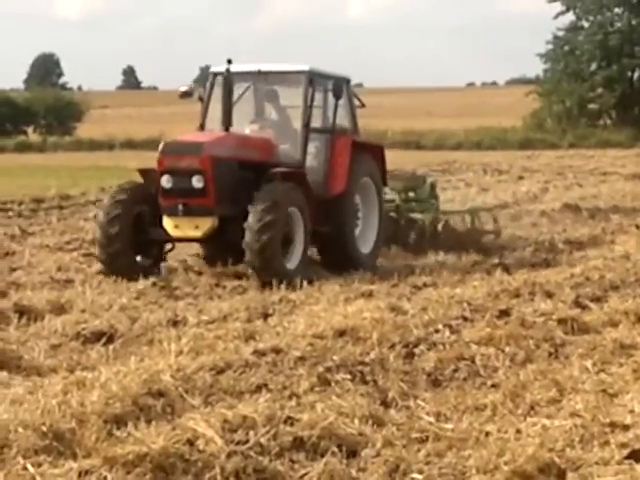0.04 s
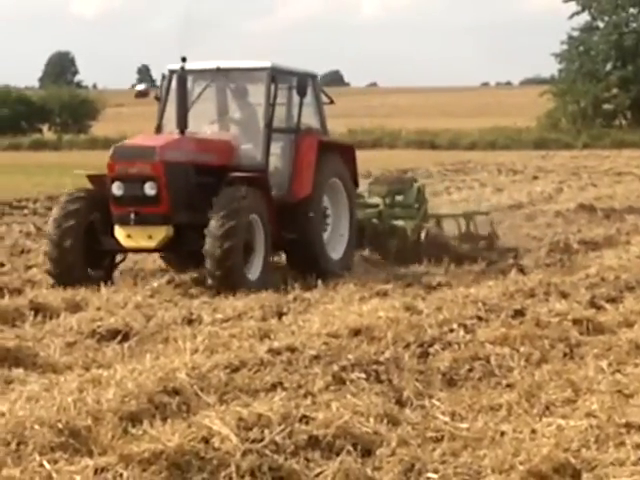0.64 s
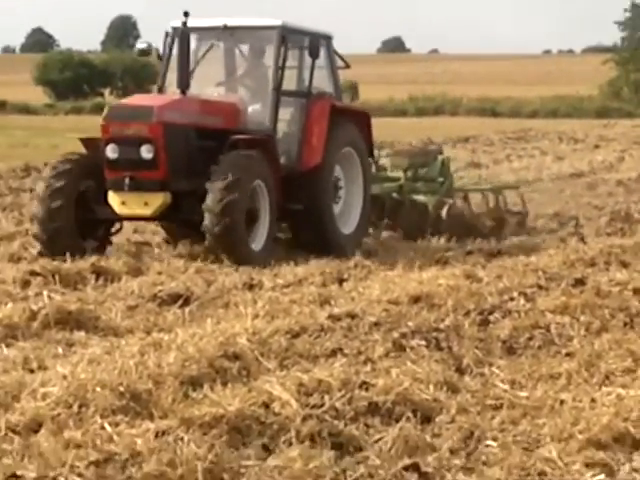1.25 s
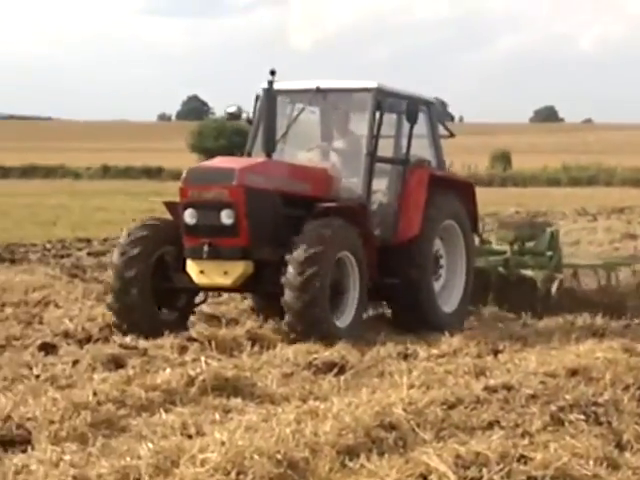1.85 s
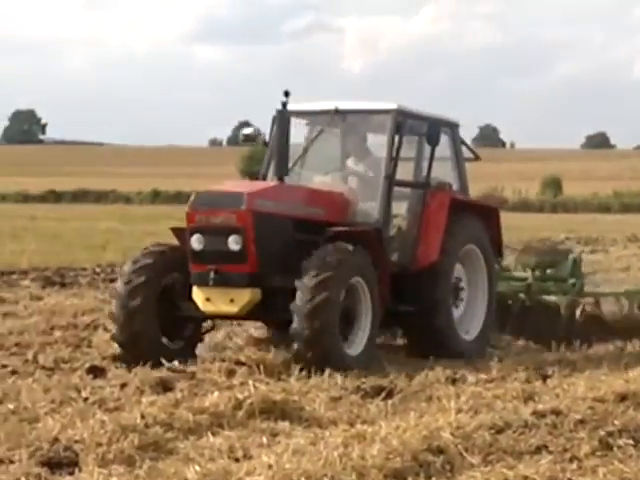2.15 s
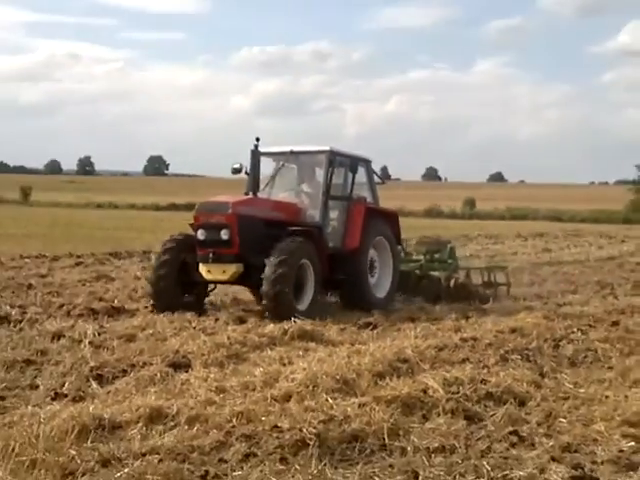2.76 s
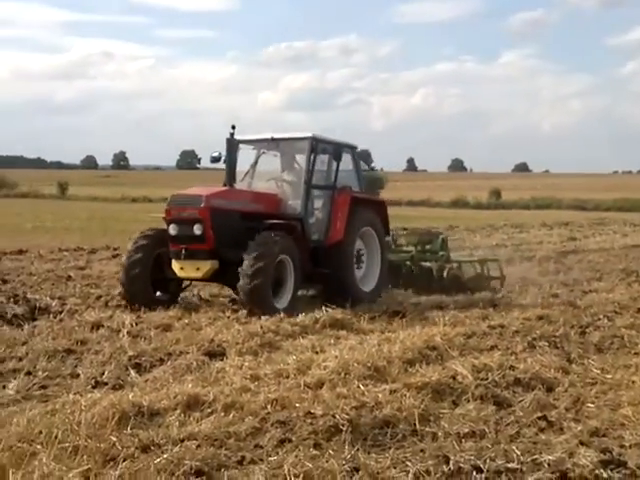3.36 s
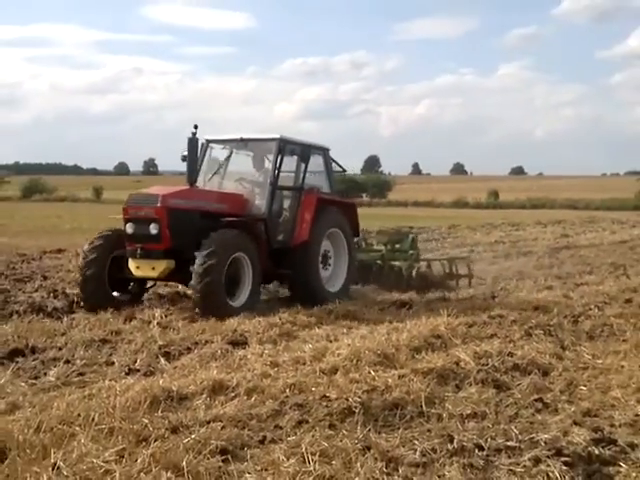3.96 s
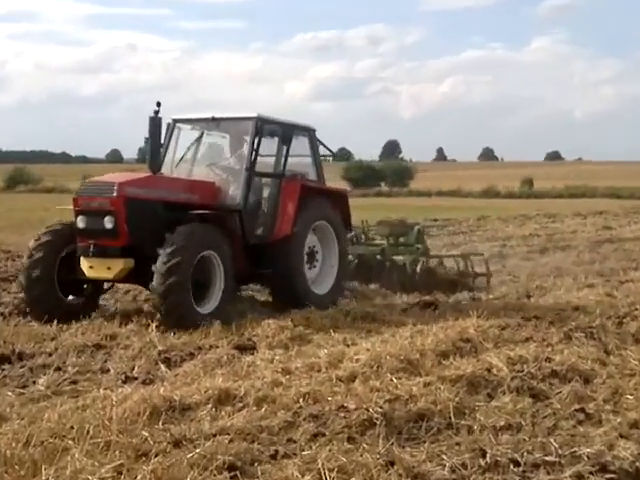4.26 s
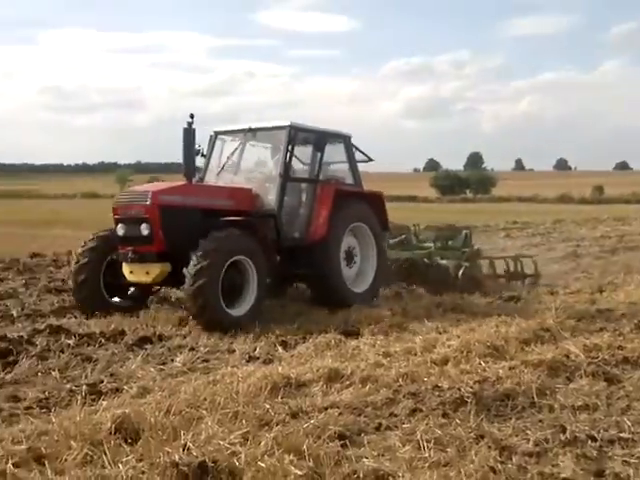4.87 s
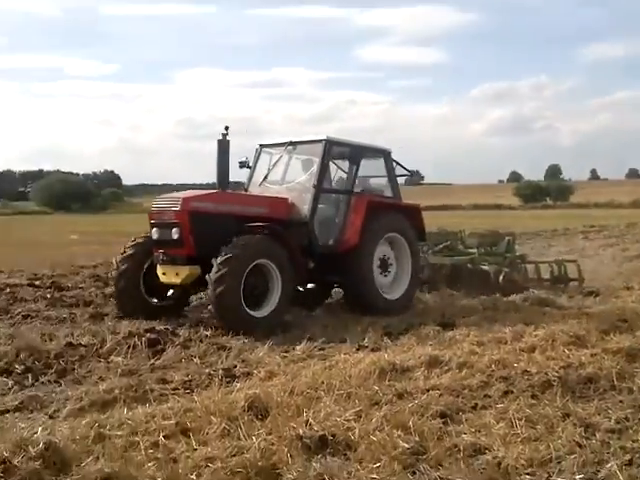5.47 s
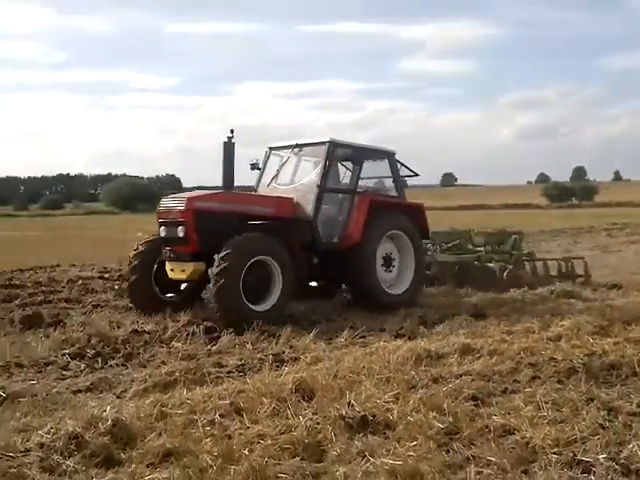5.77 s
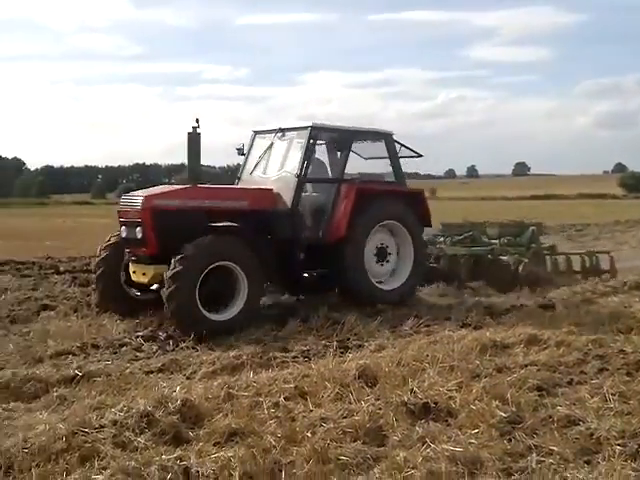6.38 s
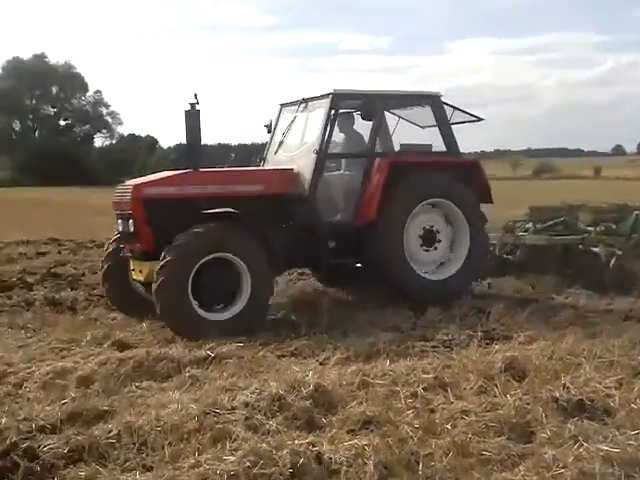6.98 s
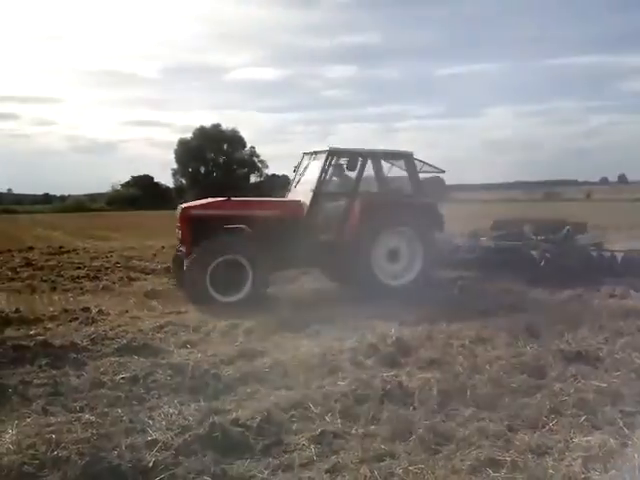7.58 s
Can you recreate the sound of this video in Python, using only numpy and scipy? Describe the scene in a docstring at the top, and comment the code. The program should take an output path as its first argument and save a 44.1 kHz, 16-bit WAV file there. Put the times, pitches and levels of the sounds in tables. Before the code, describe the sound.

A diesel tractor drones and clatters closer under load, with rising gear whine, clinking steel and wind rumbling on the microphone.

```python
"""A six-cylinder diesel tractor draws nearer, pulling a disc harrow over stubble; a breeze rumbles on
the microphone ports throughout. It starts head-on: the exhaust drones at the firing rate, the block
knocks, injectors snap, discs hiss through straw. Each bite of the discs slows the crank and the
governor adds fuel. Straw rustles at 1.2 s. From 3.5 s the gear whine grows; from 4 s loose steel
clinks and grit scrapes. The engine sags deepest near 6.2 s and ends close by, almost side-on."""
import sys
import numpy as np
from scipy import signal
from scipy.fft import rfft, irfft
from scipy.io import wavfile
from scipy.ndimage import uniform_filter1d, map_coordinates

SR = 44100
rng = np.random.default_rng(int(sys.argv[2]) if len(sys.argv) > 2 else 0)


def generate_wav(sig):
    """Save sig (samples, or channels by samples) to the path in sys.argv[1] as 16-bit PCM at SR."""
    pcm = np.round(np.clip(np.atleast_2d(sig).T, -1, 1) * 32767).astype(np.int16)
    wavfile.write(sys.argv[1], SR, pcm)


N = 336924
TIME = np.arange(N) / SR
HZ = np.maximum(np.arange(N // 2 + 1) * SR / N, 1)
CYLINDERS = 6  # firings per engine cycle (two crank turns)


def exhaust(cycle, turn, effort_hz, waver_db=2.05, load_db_per_hz=0.56):
    """Low lines locked to the crank, louder with more fuel; all but the firing line waver."""
    # Each row: cycle multiple, head-on dB, side-on dB. 6 is the firing rate, 3 one manifold.
    orders = [(3, -25, -18), (6, 1.5, 3.5), (9, -6.5, -14), (10, -32, -13), (11, -38, -21),
              (12, -12.5, -13), (13, -34, -18.5), (15, -25.5, -16.5), (16, -49, -26), (17, -36.5, -34),
              (20, -51, -35), (21, -30.5, -17), (23, -37, -25), (24, -22.5, -22.5), (27, -23.5, -25),
              (28, -55, -20), (30, -31.5, -42), (33, -37, -38)]
    # Stack resonances lift lines that slide into them. Each row: centre in Hz, width in Hz, gain in dB.
    stack = [(191.8, 11, 3), (238.9, 15.4, 6.5), (313.3, 12, 11.5)]
    # Drone in light soil. Each row: time in seconds, relative level in dB.
    drone = [(0, -21.5), (1.2, -20.5), (2.05, -21.5), (2.3, -20), (2.7, -20.5), (3.05, -18.5), (3.3, -18.5),
             (3.55, -20.5), (3.8, -20), (4.15, -20.5), (4.45, -19.5), (4.75, -20.5), (5.3, -21), (5.9, -20),
             (6.05, -22.5), (6.27, -19), (6.55, -21), (7.2, -20.5), (7.64, -18.5)]
    cycle_hz = np.gradient(cycle) * SR
    lines = 0
    for multiple, front_db, side_db in orders:
        phase = rng.random() * (multiple % (CYLINDERS // 2) > 0)  # manifold lines stay in step
        line = np.sin(2 * np.pi * (multiple * cycle + phase))
        stack_db = sum(db / (1 + (2 * (multiple * cycle_hz - hz) / width_hz) ** 2)
                       for hz, width_hz, db in stack)
        gain = from_db(stack_db + waver_db * drift(9.2) * (multiple != CYLINDERS))
        facing = (1 - turn) * from_db(front_db) + turn * from_db(side_db)
        lines = lines + line * gain * facing
    drone_db = in_time(drone)[0] + load_db_per_hz * effort_hz
    channel_db = [[-3.5], [-3.35]]
    return np.sqrt(2) * lines * from_db(drone_db) * from_db(channel_db)


def block(cycle, repeat_hz=2400, valve_hz=2600, valve_lead_cycles=0.019):
    """Spectra of the shaking block and its scattered clatter: combustion knocks low, valves tick high."""
    # Each entry: one cylinder's knock in dB, in firing order.
    knock_db = [-1, 2.2, -0.3, -1.2, -1.4, 1]
    # Each entry: one cylinder's valve and injector tick in dB.
    tick_db = [2.4, 0.77, 2.1, 2.1, 0.44, 0.44]
    # Direct sound of the block. Each row: frequency in Hz, density in dB.
    block_spectrum = [(270, -0.5), (430, -11.5), (500, -12.5), (630, -2), (790, -0.2), (1000, -6),
                      (1120, -13), (1800, -9), (3000, -21.5), (4300, -17), (6000, -27), (8000, -40.5),
                      (14500, -71)]
    # Clatter scattered by cab, wheels and ground. Each row: frequency in Hz, density in dB.
    scatter_spectrum = [(200, -50), (400, -14.5), (800, -19), (1400, -16), (2000, -25), (3000, -20),
                        (4200, -18.5), (5500, -30.5), (7500, -39), (14500, -70)]
    period = int(N / cycle[-1])
    one_cycle = unit(irfft(np.exp(2j * np.pi * rng.random(period // 2 + 1)), period))  # flat spectrum
    repeating = map_coordinates(one_cycle, [cycle % 1 * period], order=3, mode="grid-wrap")
    repeat_share = 0.62 * below(repeat_hz, order=2) * (1 - below(570, order=4))
    shake = filtered(repeating, np.sqrt(repeat_share))
    shake += filtered(rng.standard_normal(N), np.sqrt(1 - repeat_share))
    knocks = unit(firing_bursts(cycle, knock_db, decay=0.42, floor=2.4))
    ticks = unit(firing_bursts(cycle + valve_lead_cycles, tick_db, decay=1.0, floor=0.87))
    low = below(valve_hz, order=6)
    direct = (rfft(shake * knocks) * low + rfft(shake * ticks) * (1 - low)) * colour(block_spectrum)
    scattered = rfft(rng.standard_normal((2, N)) * ticks) * colour(scatter_spectrum)
    return direct, scattered


def firing_bursts(cycle, pattern_db, decay, floor, rise=0.082, uneven_db=0.5):
    """Envelope of unequal firings above a floor; rise and decay in firing periods."""
    firing = cycle * CYLINDERS
    number, age = firing.astype(int), firing % 1
    chance_db = uneven_db * rng.standard_normal(number[-1] + 1)
    strength_db = np.take(pattern_db, number, mode="wrap") + chance_db[number]
    burst = np.minimum(age / rise, np.exp((rise - age) / decay))
    return uniform_filter1d(from_db(strength_db), size=90) * (floor + burst)


def panels(spectrum, turn):
    """Different ringing sheets of metal face the listener as the tractor comes round."""
    # Bonnet, sump and covers. Each row: centre in Hz, width in Hz, head-on dB, side-on dB.
    modes = [(666.4, 28, -1, 3.5), (840, 240, 1, 1), (922, 160, 4, -3), (1183, 146, 4, -2),
             (1454, 52, 1.5, 10.5), (1610, 144, -6.5, -9), (1833, 90, 4, -3), (2350, 240, 4, -0.5),
             (2780, 220, -8.5, -4.5), (4280, 174, -0.5, -1), (3330, 520, 4, 5.5), (4600, 400, -15, -14),
             (5360, 1050, 2.5, 5.5), (5860, 250, -3.5, 0.5)]
    front = resonant([(hz, width_hz, db) for hz, width_hz, db, _ in modes])
    side = resonant([(hz, width_hz, db) for hz, width_hz, _, db in modes])
    return (1 - turn) * irfft(front * spectrum, N) + turn * irfft(side * spectrum, N)


def approach(sound, effort_hz):
    """Boom and knock outgrow the clatter as the engine's side comes into view; all rise with effort."""
    # Engine in light soil. Each row: time in seconds, then relative boom, knock and clatter in dB.
    radiated = [(0.0, -44, -31.5, -34.5), (1.4, -39, -30.5, -33), (2.6, -37, -28, -32),
                (4.3, -35.5, -25.5, -32.5), (5.7, -30.5, -24.5, -31.5), (6.4, -32, -24, -32.5),
                (7.64, -31.5, -23.5, -32)]
    boom_db, knock_db, clatter_db = in_time(radiated)
    under_boom, under_knock = below(220, order=8), below(520, order=12)
    under_clatter = below(1300, order=12)
    boom = unit(filtered(sound, under_knock * (1 - under_boom)))
    knock = unit(filtered(sound, under_clatter - under_knock))
    clatter = unit(filtered(sound, 1 - under_clatter))
    return (from_db(boom_db - 1.5 + 0.23 * effort_hz) * boom
            + from_db(knock_db + 0.1 * effort_hz) * knock
            + from_db(clatter_db - 1.78 + 0.35 * effort_hz) * clatter)


def injectors(cycle, lag_firings=0.75, jitter_s=0.0007, cluster_db=2, valve_db=-3.5, fall_per_s=0.004):
    """Each firing snaps an injector and a valve seats soon after; the ticks come in loose clusters."""
    # Each entry: one injector's snap in dB, in firing order.
    pattern_db = [5.5, 2.5, 5.5, 3, 5, 1]
    # Metal rung by the snaps. Each row: frequency in Hz, left dB, right dB, t60 in seconds.
    modes = [(2570, -9, -6, 0.009), (3780, -20, -4, 0.011), (4190, 4, 4, 0.019), (4400, -8, 1.5, 0.011),
             (4740, -2, -8, 0.009)]
    # Snaps fade as the front turns away. Each row: time in seconds, level in dB.
    ticking = [(0, -42.5), (0.22, -41), (0.4, -36), (0.88, -36), (1.1, -38.5), (1.45, -39.5), (1.75, -42),
               (2.05, -38), (2.3, -38.5), (2.52, -36), (3.1, -36.5), (3.8, -38), (4.25, -40), (4.55, -37.5),
               (5.1, -36.5), (5.8, -38), (6.4, -39), (6.9, -44), (7.64, -48)]
    fired = np.flatnonzero(np.diff(np.floor(cycle * CYLINDERS - lag_firings)))
    snap_db = np.resize(pattern_db, len(fired)) + cluster_db * drift(21)[fired]
    snap_s = fired / SR + jitter_s * rng.standard_normal(len(fired))
    valve_s = snap_s + rng.uniform(0.002, 0.008, len(fired))
    blow_s, blow_db = np.append(snap_s, valve_s), np.append(snap_db, snap_db + valve_db)
    pitch = 1 - fall_per_s * (blow_s - TIME.mean())  # sinks as the tractor comes round
    rings = struck(blow_s, blow_db, modes, pitch=pitch)
    return from_db(in_time(ticking)[0]) * rings / rings.std()


def hollow_ring(clatter, width_hz=75, wobble_hz=12, right_db=-2, right_lag_ms=0.053):
    """Clatter through one narrow resonance that shifts as the tractor comes round."""
    # Path of the resonance. Each row: time in seconds, centre in Hz, level in dB.
    path = [(0, 1708, -44), (1.2, 1620, -38), (2.2, 1660, -37.5), (3.3, 1640, -38.5), (4.1, 1651, -43),
            (4.9, 1800, -45), (5.8, 1740, -37), (6.2, 1750, -37), (6.45, 1660, -36), (6.8, 1630, -52),
            (7.64, 1630, -40)]
    hz, db = in_time(path)
    carrier = np.exp(2j * np.pi * np.cumsum(hz + wobble_hz * drift(7)) / SR)
    pole = np.exp(-2 * np.pi * width_hz / SR)
    left = signal.lfilter([1], [1, -2 * pole, pole * pole], clatter / carrier) * carrier
    right = left * np.exp(-2j * np.pi * hz * right_lag_ms / 1000) * from_db(right_db)
    return from_db(db) * unit(np.array([left.real, right.real]))


def gears(cycle, turn, whine_teeth_per_cycle=50, flutter_db=2.5, backlash_rad=0.12):
    """Meshing teeth growl and one mesh sings out; all flutter at random in level and phase."""
    # Growl lines. Each row: cycle multiple, head-on dB, side-on dB.
    growl = [(39, -49, -47), (45, -47, -48), (48, -44, -37), (51, -45, -40), (57, -45, -42), (58, -46, -44),
             (63, -48, -50)]
    # Timing gear whine. Each row: time in seconds, level in dB.
    whine = [(0, -47), (3.1, -42), (3.5, -34), (4.05, -36), (4.4, -30.5), (5.0, -30), (5.4, -28),
             (5.68, -30), (5.85, -24), (6.08, -33), (6.6, -35), (7.0, -31), (7.64, -35)]
    lines = [(multiple, front_db + turn * (side_db - front_db)) for multiple, front_db, side_db in growl]
    lines.append((whine_teeth_per_cycle, in_time(whine)[0]))
    sound = 0
    for multiple, db in lines:
        gain = from_db(db + flutter_db * drift(26))
        phase_rad = 2 * np.pi * (multiple * cycle + rng.random()) + backlash_rad * drift(25)
        sound = sound + gain * np.sin(phase_rad)
    return np.sqrt(2) * sound


def drag_hz(lag_s=0):
    """Firing rate lost as the discs bite into heavy ground; negative when they skip free."""
    # Each row: peak time in seconds, sag in Hz, build-up in seconds, recovery in seconds.
    bites = [(0.278, 2.5, 0.12, 0.3), (1.351, -1.88, 0.11, 0.12), (1.68, 1.37, 0.11, 0.13),
             (2.331, 2.5, 0.41, 0.37), (3.1, 3.5, 0.24, 0.18), (3.75, 2.5, 0.24, 0.26),
             (4.4, 2.5, 0.42, 0.35), (4.951, 2.5, 0.23, 0.31), (5.65, 4, 0.35, 0.57),
             (6.189, 7, 0.24, 1.12), (6.78, 0.72, 0.28, 0.15), (7.53, 2.5, 0.5, 0.28)]
    return sum(sag_hz * np.interp(TIME - lag_s, [s - build_s, s, s + recovery_s], [0, 1, 0])
               for s, sag_hz, build_s, recovery_s in bites)


def disc_work_db(soil_lag_s=0.17, load_db_per_hz=0.5):
    """Level of the working discs; thrown soil lifts it just after each bite."""
    # Discs in straw and light soil. Each row: time in seconds, level in dB.
    cutting = [(0.0, -65), (0.6, -58.5), (1.8, -64), (2.6, -59.5), (3.9, -57.5), (5.4, -58), (5.8, -56.5),
               (6.05, -59), (6.4, -54.5), (7.0, -57.5), (7.64, -57.5)]
    return in_time(cutting)[0] + load_db_per_hz * drag_hz(soil_lag_s)


def harrow(snaps_per_s=1400, snap_db=-11, clump_db=1.1, clump_hz=25):
    """Stalks snap at random over the smooth hiss of sliding soil, swelling in clumps."""
    # Hiss of straw and soil. Each row: frequency in Hz, density in dB.
    straw = [(600, -30), (3000, -1), (5400, 5), (7000, 1), (9000, 0), (12000, -2), (14000, -3), (15500, -9)]
    snaps = grains(snaps_per_s, spread_db=6, max_db=24)
    soil = rng.standard_normal((2, N))
    hiss = filtered(unit(soil) + from_db(snap_db) * unit(snaps), colour(straw))
    top = filtered(hiss.mean(0), 1 - below(8000, order=16))
    top_db = disc_work_db() + clump_db * drift(clump_hz)  # level above 8 kHz
    return from_db(top_db) * hiss / top.std()


def scrapes(grains_per_s=1800):
    """Grit crunches against the steel discs in short swells of separate grains."""
    # Gritty clods. Each row: peak time in seconds, level in dB, Gaussian sigma in seconds.
    clods = [(4.598, -45, 0.071), (5.808, -41.5, 0.085), (6.25, -42, 0.091), (6.46, -39.5, 0.048),
             (6.86, -48, 0.062), (7.414, -51, 0.048)]
    # Grit on steel. Each row: frequency in Hz, density in dB.
    grit = [(1500, -29), (2800, -17), (3500, 9), (4300, -13), (4650, 2), (5350, 8.5), (5900, -3),
            (6250, 3.5), (7000, -21), (14000, -42)]
    crunch = filtered(grains(grains_per_s, spread_db=4.5, max_db=13.5), colour(grit))
    return sum(swells(clods)) * unit(crunch)


def rattles(per_s=45, above_hiss_db=20.5, spread_db=2):
    """Loose steel on the harrow jingles as hard as the discs work, with a few louder clinks."""
    # Clinks of loose discs and links. Each row: start in seconds, level in dB.
    clinks = [(4.085, -27), (5.662, -27), (5.762, -27), (6.42, -28), (6.475, -24.5), (6.55, -28),
              (6.854, -26), (6.886, -25.5), (7.373, -25.5)]
    # Disc modes. Each row: frequency in Hz, left dB, right dB, t60 in seconds.
    modes = [(2300, -6, -9, 0.025), (2750, -8, -6, 0.02), (3080, -8, -9, 0.035), (3620, -5, 0, 0.03),
             (3800, -6, -2, 0.025), (4650, -5, -8, 0.015), (5300, -6, -14, 0.015)]
    jingle_s = np.sort(rng.uniform(0, TIME[-1], int(per_s * TIME[-1])))
    jingle_db = np.interp(jingle_s, TIME, disc_work_db()) + above_hiss_db
    jingle_db += spread_db * rng.uniform(-1, 1, len(jingle_s))
    jingle = struck(jingle_s, jingle_db, modes, scatter=0.025)
    clink_s, clink_db = np.transpose(clinks)
    return jingle + struck(clink_s, clink_db, modes, uneven_db=5)


def rustle():
    """A short crunch of dry straw close by."""
    # Each row: peak time in seconds, level in dB, Gaussian sigma in seconds.
    crunches = [(1.174, -34, 0.015)]
    # Dry straw. Each row: frequency in Hz, density in dB.
    spectrum = [(800, 0), (2500, 4), (4000, 5), (6000, -1), (8000, -13), (13000, -21), (15000, -29)]
    return sum(swells(crunches)) * unit(filtered(rng.standard_normal((2, N)), colour(spectrum)))


def breeze(lumpy_db=1.05, gain_db=4, windward_db=5):
    """Gusts ride on a steady breeze; eddies buffet each port separately, the windward right harder."""
    # Steady breeze. Each row: time in seconds, relative level in dB.
    steady = [(0.0, -29.5), (1.5, -26.5), (2.6, -31), (4.7, -27), (6.1, -32), (7.64, -32)]
    # Gusts. Each row: peak time in seconds, relative level in dB, Gaussian sigma in seconds.
    gusts = [(0.093, -22, 0.027), (0.267, -35, 0.067), (0.502, -24, 0.05), (0.98, -27.5, 0.054),
             (1.248, -39, 0.027), (1.59, -24, 0.055), (3.425, -26.5, 0.024), (3.66, -24.5, 0.018),
             (3.793, -31, 0.028), (4.056, -30, 0.044), (4.56, -27.5, 0.036), (5.29, -30, 0.031),
             (6.531, -30, 0.094), (7.494, -25.5, 0.044)]
    # Wind rumble. Each row: frequency in Hz, density in dB.
    spectrum = [(10, -30), (20, -5), (32, 0.5), (55, 0), (80, -2), (120, -7), (180, -15), (260, -27.5),
                (450, -48.5), (1500, -81)]
    strength = np.linalg.norm([from_db(in_time(steady)[0])] + swells(gusts), axis=0)
    eddies = rng.standard_normal((2, N)) * from_db(lumpy_db * np.array([drift(3.6), drift(11)]))
    balance = from_db([[-windward_db / 2], [windward_db / 2]])
    return from_db(gain_db) * strength * unit(filtered(eddies, colour(spectrum)) * balance)


def ports(right_lag_ms=0.088):
    """Response of the two microphone ports to direct sound, which reaches the right one later."""
    # Peaks and notches of each port. Each row: centre in Hz, width in Hz, gain in dB.
    left = [(1373, 130, -11.5), (1587, 120, 13.5), (1847, 175, -20), (2160, 390, 8), (4030, 700, -5.5),
            (4820, 160, 9.5), (5430, 250, 5.5)]
    right = [(546, 25.4, -31.5), (1290, 107, 9), (1457, 244, -18), (1916, 1720, 9.5), (2450, 100, -6),
             (2440, 290, 6), (3110, 426, -38), (4100, 750, 6.5), (6030, 660, -12)]
    delay = np.exp(-2j * np.pi * HZ * right_lag_ms / 1000)
    return np.array([resonant(left), resonant(right) * delay])


def treble_colour(sound):
    """Narrow peaks and dips colour the treble, differently on each side."""
    # Peaks and dips on each side. Each row: centre in Hz, width in Hz, gain in dB.
    left = [(2800, 300, 2.5), (3620, 420, -4.5), (4570, 300, 5), (5400, 300, -1)]
    right = [(2330, 160, -6), (2640, 350, 4.5), (3290, 350, -4.5), (3720, 250, 1.5), (4000, 150, -4),
             (4400, 350, 2.5), (4930, 200, -4.5), (5500, 700, -3), (6650, 300, -4), (7080, 350, 4),
             (7480, 250, -3)]
    return filtered(sound, np.array([resonant(left), resonant(right)]))


def struck(start_s, db, modes, pitch=1, scatter=0.011, uneven_db=4.5, rise_s=0.0004, right_lag_ms=0.078):
    """Blows ring metal modes; each blow gives each mode its own strength and a slight detuning."""
    age_s = np.arange(int(1.2 * max(t60_s for *_, t60_s in modes) * SR)) / SR
    index = (np.clip(start_s, 0, None)[:, None] * SR).astype(int) + np.arange(len(age_s))
    out = np.zeros((2, N))
    for hz, left_db, right_db, t60_s in modes:
        detune, left, right, both = rng.standard_normal((len(start_s), 4)).T
        ring_hz = hz * pitch * (1 + scatter * detune)
        for side, (port_db, own) in enumerate([(left_db, left), (right_db, right)]):
            heard_s = np.maximum(age_s - side * right_lag_ms / 1000, 0)
            envelope = from_db(-60 * heard_s / t60_s) * (1 - np.exp(-heard_s / rise_s))
            rings = np.sin(2 * np.pi * np.outer(ring_hz, heard_s)) * envelope
            gain = from_db(db + port_db + uneven_db * (both + own) / 2)
            out[side] += np.bincount(index.ravel(), (gain[:, None] * rings).ravel(), N)[:N]
    return out


def grains(per_s, spread_db, max_db):
    """Random stereo impulses, most small, a few large."""
    sizes = from_db(np.minimum(spread_db * rng.exponential(1, N), max_db))
    return (rng.random(N) < per_s / SR) * sizes * rng.standard_normal((2, N))


def swells(rows):
    """One Gaussian envelope per row."""
    return [from_db(db) * np.exp(-0.5 * ((TIME - s) / sigma_s) ** 2) for s, db, sigma_s in rows]


def drift(rate_hz, hop=64):
    """Slow random wander, rms 1."""
    lowpass = signal.butter(2, rate_hz, fs=SR / hop, output="sos")
    slow = signal.sosfilt(lowpass, rng.standard_normal(N // hop + 502))[500:]
    return np.interp(np.arange(N) / hop, np.arange(len(slow)), unit(slow))


def resonant(resonances):
    """Complex response of a chain of peaks and notches."""
    response = 1
    for hz, width_hz, db in resonances:
        root_gain = from_db(db / 2)
        detune = 1j * (HZ ** 2 - hz ** 2) / (HZ * width_hz)
        response = response * (detune + root_gain) / (detune + 1 / root_gain)
    return response


def colour(points):
    """Gain at every frequency from (Hz, dB) points."""
    hz, db = np.transpose(points)
    return from_db(np.interp(np.log(HZ), np.log(hz), db))


def below(edge_hz, order):
    """Low-pass gain; one minus it is the matching high-pass."""
    return 1 / (1 + (HZ / edge_hz) ** order)


def filtered(x, gain):
    """Apply a frequency response."""
    return irfft(rfft(x) * gain, N)


def in_time(rows):
    """Each column of a curve at every sample."""
    s, *columns = np.transpose(rows)
    return [np.interp(TIME, s, column) for column in columns]


def from_db(db):
    """Decibels to gain."""
    return 10 ** (np.asarray(db) / 20)


def unit(x):
    """Scale so that the mean of the channels has rms 1."""
    return x / np.sqrt(np.mean(np.atleast_2d(x).mean(0) ** 2) + 1e-20)


def scene(free_firing_hz=97.18, fall_hz_per_s=0.06, governor_lag_s=0.16):
    """Disc drag slows the crank, which drives exhaust, gears and block; the governor adds fuel."""
    # Heading of the tractor. Each row: time in seconds, turn from 0 (head-on) to 1 (side-on).
    heading = [(0, 0.017), (3.2, 0.2), (4.6, 0.46), (5.6, 0.4), (6.3, 0.65), (7.1, 0.9), (7.64, 0.78)]
    turn = in_time(heading)[0]
    firing_hz = free_firing_hz - fall_hz_per_s * TIME - drag_hz()
    effort_hz = drag_hz(governor_lag_s)
    cycle = np.cumsum(firing_hz) / SR / CYLINDERS
    direct, scattered = block(cycle)
    knocking = approach(panels(direct * ports() + scattered, turn), effort_hz)
    engine = exhaust(cycle, turn, effort_hz) + gears(cycle, turn) + knocking
    metal = injectors(cycle) + hollow_ring(irfft(scattered[0], N))
    return treble_colour(engine + metal + harrow() + scrapes() + rattles()) + rustle() + breeze()


def record(dry, right_edge_hz=12300, cutoff_hz=15500, fade_s=0.002):
    """The right microphone is duller than the left; the top is cut steeply."""
    microphones = np.array([np.ones_like(HZ), below(right_edge_hz, order=16)])
    fades = np.minimum(1, np.minimum(TIME, TIME[::-1]) / fade_s)
    return filtered(dry * fades, microphones * below(cutoff_hz, order=120))


dry = scene()
out = record(dry)
generate_wav(out)
```